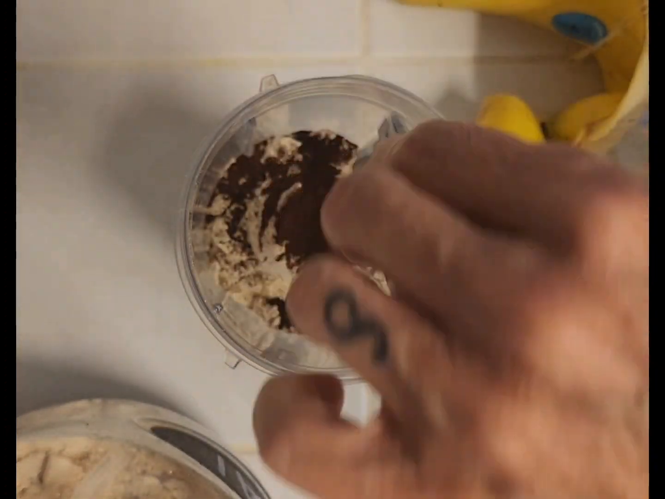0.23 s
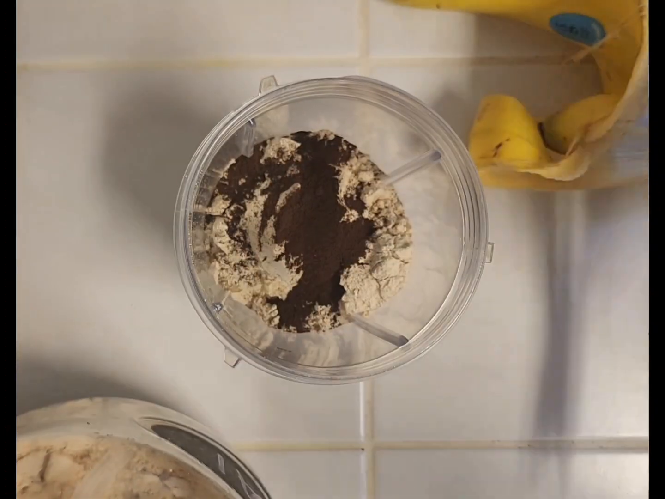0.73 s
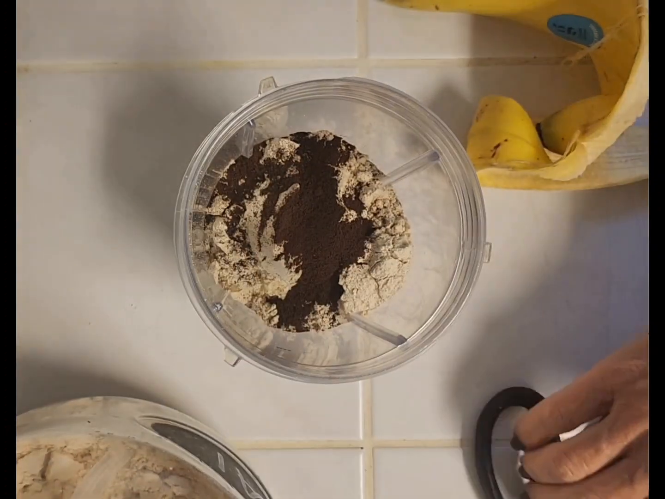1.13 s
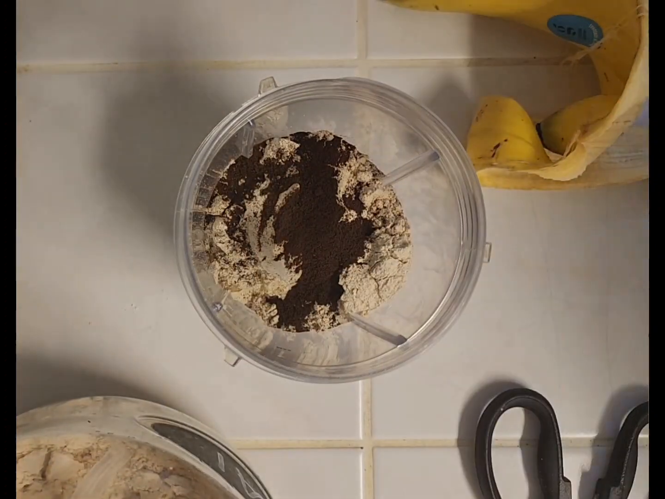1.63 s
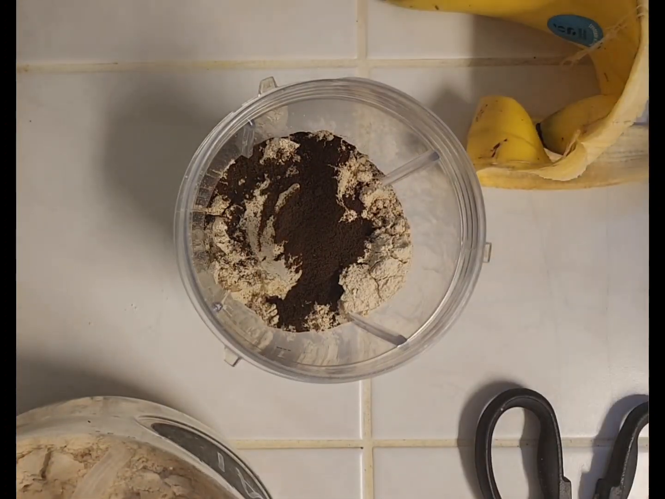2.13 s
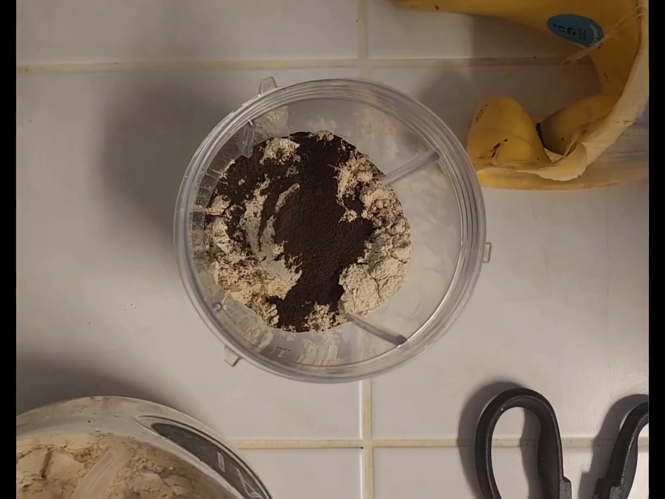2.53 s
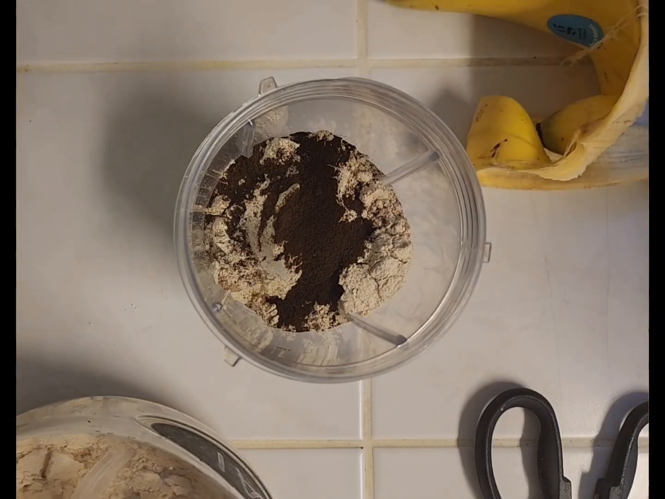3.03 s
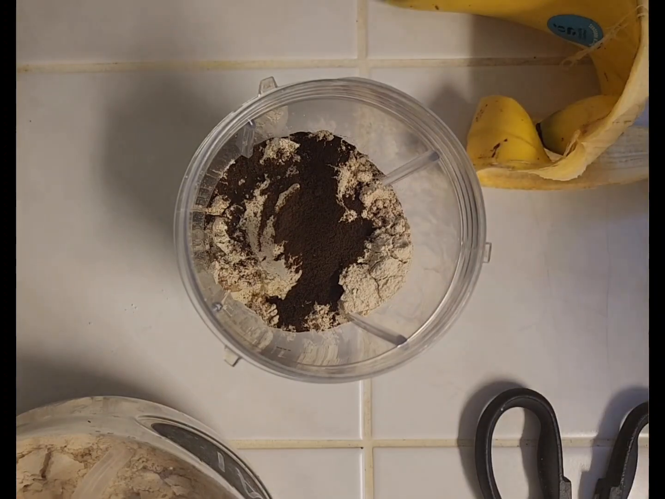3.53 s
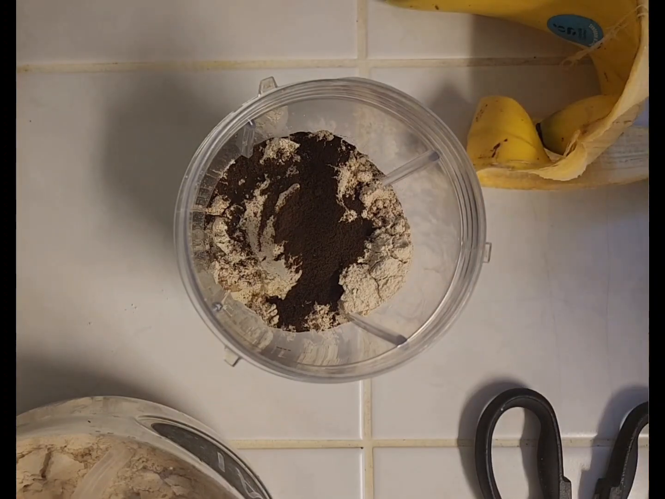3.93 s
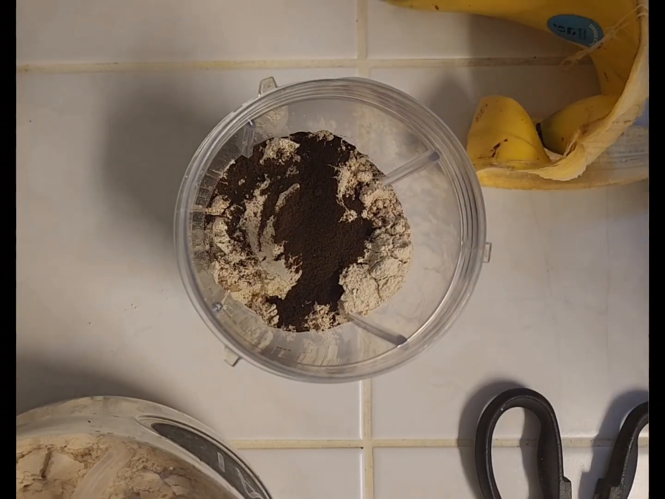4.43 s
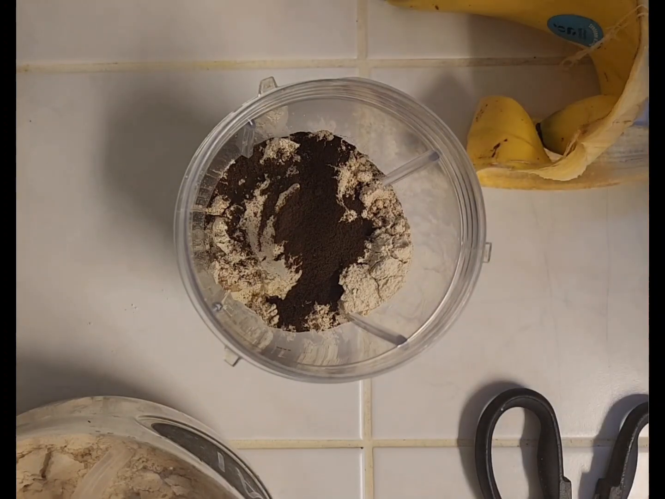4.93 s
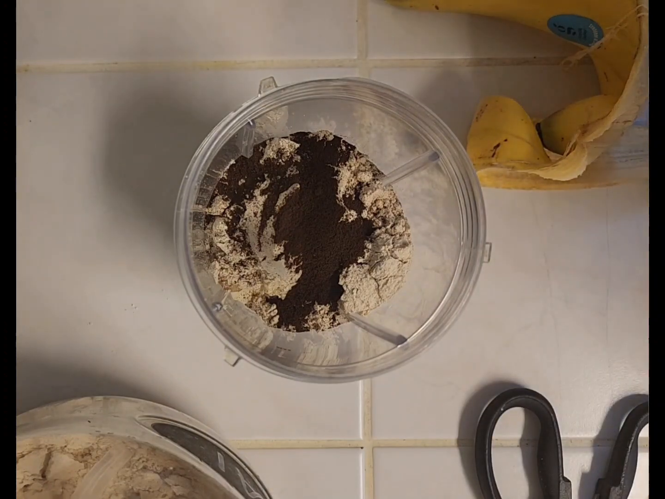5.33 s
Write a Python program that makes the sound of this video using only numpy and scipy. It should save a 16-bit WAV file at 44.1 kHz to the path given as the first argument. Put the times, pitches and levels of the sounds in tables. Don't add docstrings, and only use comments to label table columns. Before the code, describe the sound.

In a tiled kitchen with a steady low appliance rumble, a foil packet crackles and snaps close by, slightly to the left. Just after one second scissors are laid on the counter in a quick burst of bright metal clacks and dull knocks, by far the loudest moment. Light handling ticks and rustles follow, then a small shove with bumps, and finally only hum and faint touches. Close phone microphone, short bright echo.

```python
import sys
import numpy as np
from scipy import signal
from scipy.fft import rfft, irfft
from scipy.io import wavfile
from scipy.ndimage import uniform_filter1d

SR = 44100
rng = np.random.default_rng(int(sys.argv[2]) if len(sys.argv) > 2 else 0)


def store_wav(level_fs):
    pcm = np.round(np.clip(np.atleast_2d(level_fs), -1, 1) * 32767)
    wavfile.write(sys.argv[1], SR, pcm.T.astype(np.int16))


def voltage_ratio(decibels):
    exponent = np.asarray(decibels, float) / 20
    return 10 ** exponent


N = 245637
T = np.arange(N) / SR


def unit(x):
    return x / np.sqrt(np.mean(x ** 2))


def band(x, lo_hz, hi_hz, order=2):
    edges_hz = [lo_hz, min(hi_hz, 0.47 * SR)]
    return signal.sosfilt(signal.butter(order, edges_hz, "band", fs=SR, output="sos"), x)


def fade(t, t60_s):
    return np.exp(-np.log(1000) * t / t60_s)


def ring(t, pitch_hz, level_db, t60_s):
    pitch_hz, level_db, t60_s = (np.reshape(v, (-1, 1)) for v in (pitch_hz, level_db, t60_s))
    return np.sum(voltage_ratio(level_db) * np.sin(2 * np.pi * pitch_hz * t) * fade(t, t60_s), axis=0)


def walk(rate_hz):
    hold = int(SR / rate_hz)
    steps = np.repeat(rng.standard_normal(N // hold + 1), hold)
    return uniform_filter1d(uniform_filter1d(steps, hold), hold)[:N]


def add(path, start_s, sound, level_db):
    i = int(start_s * SR)
    path[i:i + len(sound)] += voltage_ratio(level_db) * sound[:N - i]


# pitch_hz, density_db (per Hz)
RUMBLE_SPECTRUM = [(12, -37.5), (20, -12), (60, 1), (101, 0), (204, -17.5), (293, -37), (873, -43),
                   (1370, -39.5), (2460, -48), (7310, -51.5), (8650, -51), (9670, -71), (14300, -65),
                   (16000, -74)]
# pitch_hz, width_hz, level_db
WHISTLES = [(1410, 120, -89), (1950, 250, -93), (4100, 300, -94), (4950, 200, -96), (7600, 500, -95)]


def floor():
    hz = np.arange(N // 2 + 1) * SR / N + 1
    pitch_hz, density_db = np.transpose(RUMBLE_SPECTRUM)
    shape = voltage_ratio(np.interp(np.log(hz), np.log(pitch_hz), density_db))
    mid, side = (rfft(rng.standard_normal(N)) * shape for _ in range(2))
    side = side * np.clip((hz / 380) ** 2, 0.07, 1)
    both = np.array([irfft(mid + side, N), irfft(mid - side, N)])
    out = unit(both) * voltage_ratio(-52.5 + 1.5 * walk(3))
    for pitch_hz, width_hz, level_db in WHISTLES:
        hiss = rng.standard_normal((2, N))
        whistle = unit(band(hiss, pitch_hz - width_hz / 2, pitch_hz + width_hz / 2, order=1))
        out = out + voltage_ratio(level_db + 3 * walk(2)) * whistle
    return out


# pitch_hz, level_db, t60_s
ROOM_BANDS = [(140, -10.5, 0.22), (293, -11.5, 0.12), (506, -0.5, 0.42), (815, -7, 0.15), (1260, 0, .48),
              (2360, 2.5, 0.44), (4500, 0.5, 0.42), (8700, 0.5, 0.35), (12800, -3, 0.12)]


def room(x):
    t, tail = T[:SR], 0
    for pitch_hz, level_db, t60_s in ROOM_BANDS:
        mid, side = (unit(band(rng.standard_normal(SR), pitch_hz / 1.364, pitch_hz * 1.32)) for _ in range(2))
        share = min((pitch_hz / 400) ** 2, 1)
        weight = voltage_ratio(level_db) * np.sqrt(pitch_hz * 2 * np.log(1000) / t60_s) / SR * 1.227
        tail = tail + weight * fade(t, t60_s) * (mid + share * side * np.array([[1], [-1]]))
    echoes = voltage_ratio(6.2 * fade(t, 0.7) * walk(500)[:SR])
    onset = 1 - fade(np.maximum(t - 0.002, 0), 0.0042)
    return signal.fftconvolve(x[None], tail * echoes * onset, axes=1)[:, :N]


# start_s, length_s, level_db, air_db (re level), body_db (re level)
DRAGS = [(0.0, 0.016, -53, -6, -12), (0.83, 0.34, -64.5, -50, -7.5), (1.095, 0.09, -65, -16, -9),
         (1.72, 0.36, -69, -21, 2), (2.419, 0.2, -81, -4, 5), (2.643, 0.18, -63.5, 7.5, -11.5),
         (2.847, 0.15, -65, 1, 2.5), (3.067, 0.18, -74, 5, -15.5), (3.234, 0.11, -62.5, -17, -13),
         (3.49, 0.166, -82, 2.5, 5), (3.784, 0.099, -46.5, -23, -10), (4.933, 0.098, -76.5, -6, 11),
         (5.468, 0.02, -67.5, -16, -17.5), (0.033, 0.18, -72, -20, -7), (5.545, 0.026, -50.5, -3, -29)]
# start_s, length_s, final_level_db, air_db, body_db (both re level)
LEAD_INS = [
    (0.407, 0.071, -54, 3, -24),
    (1.06, 0.028, -67, -13, -9),
    (1.16, 0.038, -47, -10, -1),
    (3.64, 0.09, -52.5, -39, -10),
    (3.729, 0.06, -43.5, -13, -5.5),
]
# low_hz, high_hz, level_db
RUB_RESONANCES = [(1300, 1600, -3.5), (1800, 2200, -4.5), (3670, 5000, -4)]


def rustles():
    slip_times = rng.random(N) < 1500 / SR
    slips = slip_times * voltage_ratio(4.0 * rng.exponential(size=N)) * rng.standard_normal(N)
    rub = unit(slips) * 0.16 + rng.standard_normal(N) * voltage_ratio(1.5 * walk(40))
    rub = rub * voltage_ratio(1.5 * walk(15))
    mid = unit(band(rub, 1500, 11000))
    air = -unit(band(rub, 8200, 14000))
    body = -unit(band(rub, 330, 900))
    resonances = sum(voltage_ratio(level_db) * unit(band(rub, lo_hz, hi_hz)) for lo_hz, hi_hz, level_db in RUB_RESONANCES)
    mid = unit(mid + resonances)
    presses = []
    rise_s, fall_s, swell_db = 0.03, 0.02, 16
    for start_s, length_s, *_ in DRAGS:
        rise, end = min(rise_s, length_s / 2), start_s + length_s + fall_s
        presses.append(np.interp(T, [start_s - rise, start_s + rise, end - 2 * rise, end], [0, 1, 1, 0]))
    for start_s, length_s, *_ in LEAD_INS:
        swell = voltage_ratio(swell_db * ((T - start_s) / length_s - 1).clip(-1, 0))
        presses.append(swell * (T > start_s) * (T < start_s + length_s))
    out = np.zeros(N)
    for press, (_, _, level_db, air_db, body_db) in zip(presses, list(DRAGS) + list(LEAD_INS)):
        out += voltage_ratio(level_db - 4.5) * press * (mid + voltage_ratio(air_db) * air + voltage_ratio(body_db) * body)
    return out


# start_s, peak_db, pitch_hz
PINGS = [(0.166, -49, 362), (0.022, -40.5, 640), (0.161, -31.5, 702), (0.448, -41, 656),
         (1.0878, -26.5, 7900), (1.122, -35.5, 506.5), (1.089, -33.5, 530), (1.28, -29, 480),
         (1.12, -32, 6300), (1.1214, -29, 7850), (1.1453, -32.5, 6350), (1.2067, -21.5, 2410),
         (1.2711, -15, 2847), (1.306, -14.5, 3054), (1.6828, -49.5, 4310), (1.7255, -53.5, 5700),
         (1.737, -34, 878), (1.7427, -34.5, 1785), (1.7797, -47, 5650), (3.2177, -26.5, 4330),
         (3.2196, -31.5, 2198), (3.2216, -38, 910), (3.311, -27, 684), (3.9434, -32.5, 1944),
         (3.9549, -28.5, 1400), (5.532, -40, 1800), (5.563, -37, 1390)]
# start_s, peak_db, centre_hz
RATTLES = [
    (0.019, -30.5, 2200),
    (0.4499, -33, 1950),
    (2.9297, -40, 2000),
    (3.8244, -26.5, 3400),
    (3.222, -34.5, 3500),
    (1.4, -26, 740),
    (3.956, -28, 567),
    (0.15, -43.5, 730),
    (1.31, -26, 390),
]


def pings():
    out, t = np.zeros(N), T[:3072]
    widths = [0.1] * len(PINGS) + [0.28] * len(RATTLES)
    spreads = rng.uniform(-0.85, 1, (len(widths), 12))
    for (start_s, peak_db, pitch_hz), width, spread in zip(list(PINGS) + list(RATTLES), widths, spreads):
        t60_s = min(0.03, 60 / pitch_hz)
        cluster = ring(t, pitch_hz * (1 + width * spread), -6 * np.abs(spread), t60_s)
        cluster = cluster * (1 - fade(t, 0.006))
        add(out, start_s, cluster / np.abs(cluster).max(), peak_db + 1.5)
    return out


# start_s, peak_db, pitch_hz, room_db (share)
KNOCKS = [(0.156, -50, 89.5, -20), (0.444, -74, 85.5, -1), (1.088, -33, 103, 9), (1.124, -35.5, 91, 18),
          (1.198, -24.5, 97, 15.5), (1.274, -32, 111, 17.5), (1.33, -23.5, 116.8, 11.5),
          (2.04, -41.5, 87, 11.5), (2.079, -33, 182, -20), (2.104, -32, 187, -1.5),
          (2.854, -35.5, 175, -6.5), (2.87, -29.5, 186, -6), (2.928, -43, 193, 1), (3.309, -31, 344, -2.5),
          (3.805, -37.5, 67.4, -9), (3.824, -31, 97, -30), (3.849, -29, 340, -11),
          (3.944, -25.5, 130.6, -0.5), (4.975, -46.5, 105, -4)]
# pitch_hz, level_db, t60_s
COUNTER_MODES = [(110.6, -4.5, 0.16), (146, -9, 0.15), (178, -2, .22), (191, -7, .15), (222, -7, 0.14),
                 (325, -6, 0.12), (362, -5, 0.11), (452, -7, 0.07), (484, -5, 0.09), (630, -3, .08),
                 (685, -6, .07)]


def knocks():
    near, far, t = np.zeros(N), np.zeros(N), T[:16384]
    chance = rng.standard_normal((len(KNOCKS), 2, len(COUNTER_MODES)))
    mode_hz, mode_db, mode_t60_s = np.transpose(COUNTER_MODES)
    floorboards = ring(t, 59, -24.5, 0.51)
    for (start_s, peak_db, pitch_hz, room_db), (detune, size) in zip(KNOCKS, chance):
        reach_db = -7 * np.abs(np.log2(mode_hz / pitch_hz))
        body = ring(t, mode_hz * (1 + 0.0069 * detune), mode_db + reach_db + 3 * size - 5.5, mode_t60_s)
        own_note = ring(t, pitch_hz, 0, 5.8 / pitch_hz)
        sound = (own_note + body + floorboards) * (1 - fade(t, 0.023))
        sound = sound / np.abs(sound).max()
        add(near, start_s, sound, peak_db)
        add(far, start_s, sound, peak_db + room_db)
    return near, far


# low_hz, high_hz, polarity
TICK_BANDS = [
    (2600, 7500, 1),
    (420, 780, 1),
    (950, 2600, -1),
    (7500, 17000, -1),
]
# start_s, peak_db, hardness_db (per octave), body_db (re peak), room_db (share)
FOIL_SNAPS = [
    (0.0194, -42, -8, -29, -25),
    (0.1521, -35, 2, -44, 3),
    (0.16, -38.5, -7.5, -8, -16),
    (0.167, -27.5, 4.5, -46, -10.5),
    (0.3124, -57, 9, -25, -14),
    (0.4484, -23.5, 10, -19, -12),
    (0.7539, -39, 0.5, -11.5, -4.5),
]
SCISSORS = [(1.0869, -23, 2, -20, -3.5), (1.1205, -25.5, 8.5, -9, -4), (1.1443, -40.5, 5.5, -17.5, 11),
            (1.1651, -37, -0.5, -2.5, -2.5), (1.1914, -15.5, -0.5, -10.5, 2.5),
            (1.2038, -7.5, 0.5, -12.5, -9.5), (1.2234, -20, -2, -4.5, -1), (1.2731, -7, 2, -14, -1),
            (1.2766, -17.5, 1.5, -24, -4.5), (1.2897, -21.5, -2, -8.5, -10),
            (1.3085, -18.5, 0.5, -7.5, 5.5), (1.3344, -30, -7, 6.5, 0)]
HANDLING = [(1.6842, -51.5, 0.5, -21, -5.5), (1.7275, -39.5, -1, -26, 4.5), (1.7404, -43.5, 5, 0, 0.5),
            (1.7804, -37, -2.5, -9.5, 1.5), (1.8994, -49.5, -1, -26.5, 0), (1.9694, -51.5, -5, -14, -1.5),
            (2.0777, -57.5, -4, 12.5, 6.5), (2.1041, -53, -13.5, 6.5, -10), (2.284, -68.5, -3, -2, -10.5),
            (2.8503, -41, 4, -3, 1), (2.8785, -46, -6, 12, -9.5), (2.9273, -36.5, -7, -11, -15.5),
            (3.1428, -59, 4, -22.5, -9.5), (3.2191, -29.5, 2.5, -18, -3), (3.3104, -41, -10, 17, -10.5),
            (3.5359, -62.5, 15, -7.5, -1.5), (3.5624, -55.5, -0.5, 4, -10.5), (3.6154, -55, 2.5, 7, -9.5),
            (5.4745, -57, -2, -24.5, 1), (5.5274, -63.5, -11.5, -25.5, 5),
            (5.5506, -56.5, -12.5, -28, -1.5)]
SHOVE = [
    (3.7359, -48.5, 6, -6.5, 12),
    (3.7838, -31.5, 6, -20, 0.5),
    (3.8043, -33.5, 4, -12.5, 4.5),
    (3.8227, -26.5, -1, -4, -7),
    (3.8744, -26, 2, -26, -17.5),
    (3.9434, -22.5, 2.5, -14.5, -10),
    (3.9544, -25.5, -3, -0.5, -15.5),
]


def ticks():
    near, far, t = np.zeros(N), np.zeros(N), T[:3072]
    contacts = list(FOIL_SNAPS) + list(SCISSORS) + list(HANDLING) + list(SHOVE)
    start_s, peak_db, hardness_db, body_db, room_db = np.transpose(contacts)
    clack_db, air_db = -4 - 1.5 * hardness_db, -4 + 1.3 * hardness_db
    colour_db = [0, body_db, clack_db, air_db]
    spike = 1.0 * (t == 0)
    shape = (len(start_s), len(t))
    chatter = 0.061 * voltage_ratio(4.4 * rng.exponential(size=shape))
    grit = rng.standard_normal(shape) * (fade(t, 0.016) + chatter * fade(t, 0.089))
    cracks = 1.6 * spike + grit
    for (lo_hz, hi_hz, polarity), re_peak_db in zip(TICK_BANDS, colour_db):
        blow = polarity * unit(band(spike, lo_hz, hi_hz))
        directs = polarity * band(cracks, lo_hz, hi_hz)
        for at_s, level_db, wet_db, direct in zip(start_s, peak_db + re_peak_db, room_db, directs):
            direct = direct / np.abs(direct).max()
            add(near, at_s, direct, level_db - 1.96)
            add(far, at_s, blow * np.std(direct), level_db + 0.63 + wet_db)
    return near, far


# start_s, left_minus_right_db
SIDE_OF = [(0.0, 9), (0.62, 7.5), (0.74, 14.5), (0.88, -0.5), (1.09, 7), (1.47, -1.5), (2.5, 10.5),
           (2.81, 3), (4.11, 1.5), (4.25, -1.5), (4.65, 4.5), (5.57, 2.5)]


def scene():
    (tick, tick_far), (knock, knock_far), rustle, ping = ticks(), knocks(), rustles(), pings()
    near = tick + knock + rustle + ping
    pan_db = np.interp(T, *np.transpose(SIDE_OF))
    sides_db = np.array([pan_db, -pan_db])
    lag = 24
    ports = np.array([near, np.pad(near, (lag, 0))[:N]])
    walls = room(tick_far + knock_far + voltage_ratio(-0.5) * rustle + voltage_ratio(-6) * ping)
    return ports * voltage_ratio(sides_db / 2) + walls * voltage_ratio(0.1 * sides_db) + floor()


def top_cut(x):
    return signal.sosfilt(signal.butter(12, 16650, fs=SR, output="sos"), x)


# pitch_hz, width_hz, depth (0-1)
PORT_DIP = (9900, 4500, 0.74)


def record(dry):
    pitch_hz, width_hz, depth = PORT_DIP
    dry = dry - depth * band(dry, pitch_hz - width_hz / 2, pitch_hz + width_hz / 2, order=1)
    rounded = np.tanh(0.63 * dry) / 0.56
    low_pass = signal.butter(12, 15300, fs=SR, output="sos")
    mix = signal.sosfilt(low_pass, rounded)
    return top_cut(mix)


dry = scene()
out = record(dry)
store_wav(out)
```